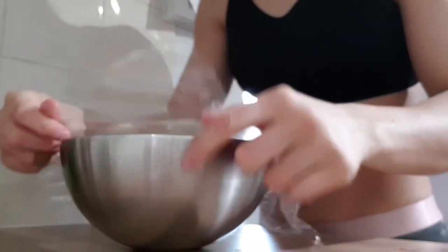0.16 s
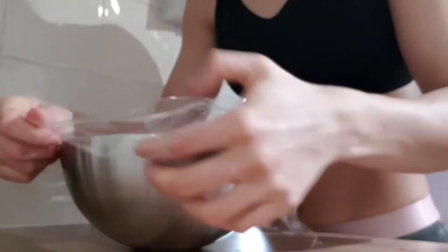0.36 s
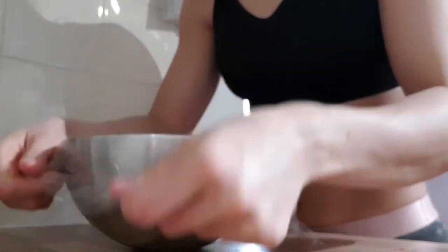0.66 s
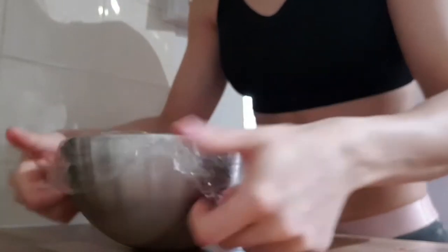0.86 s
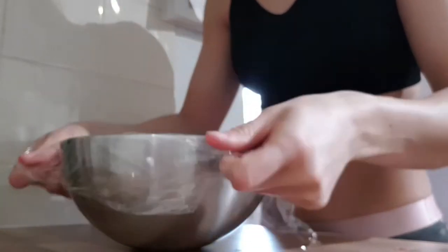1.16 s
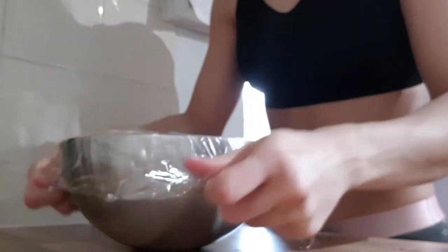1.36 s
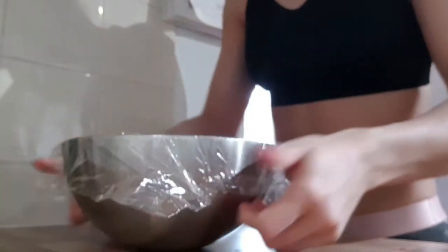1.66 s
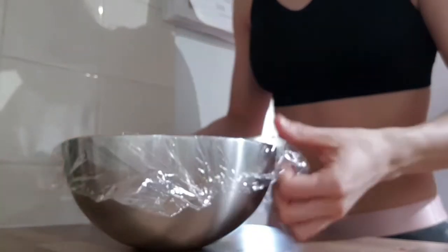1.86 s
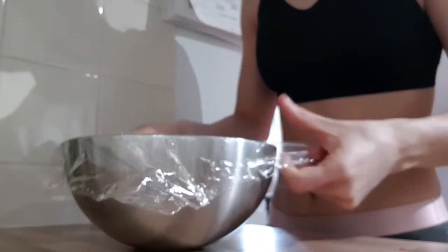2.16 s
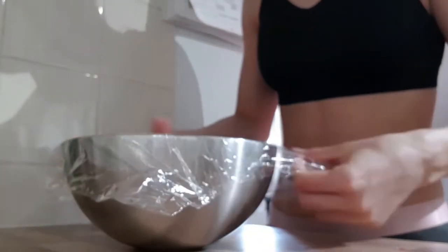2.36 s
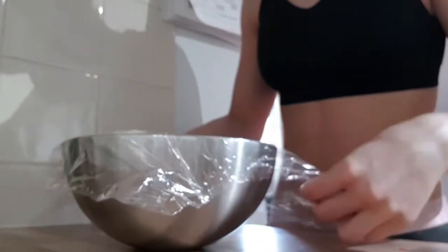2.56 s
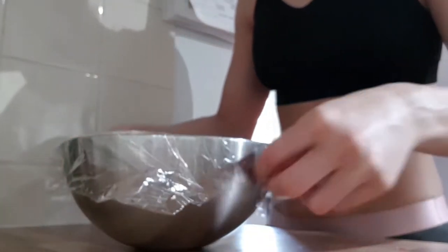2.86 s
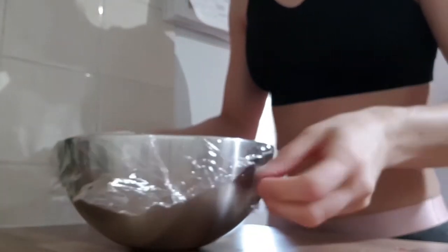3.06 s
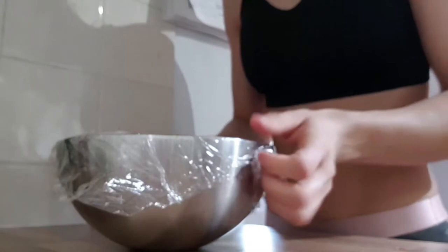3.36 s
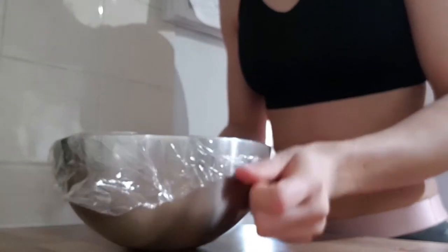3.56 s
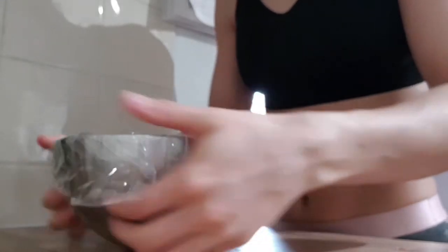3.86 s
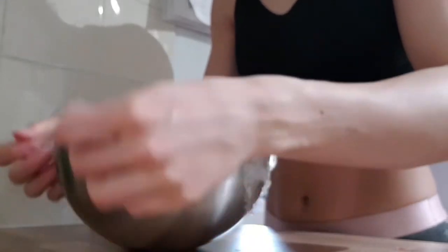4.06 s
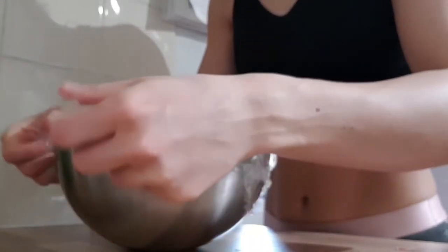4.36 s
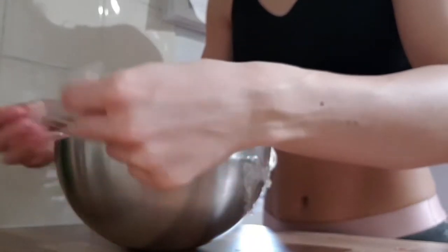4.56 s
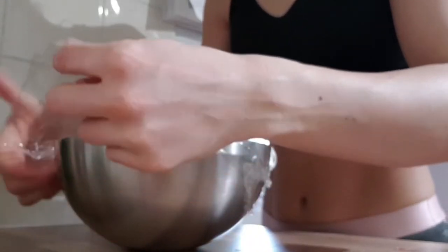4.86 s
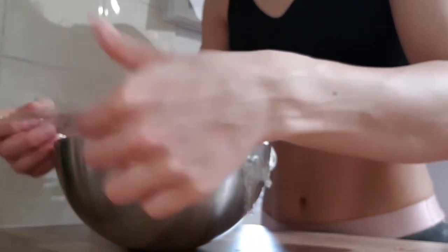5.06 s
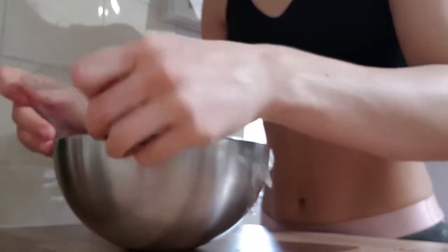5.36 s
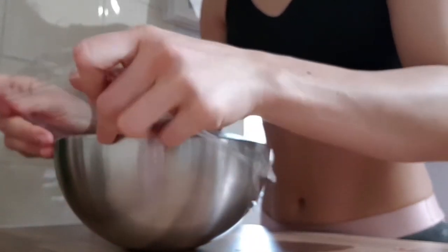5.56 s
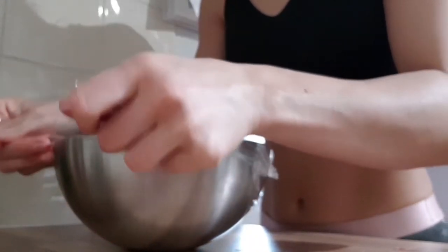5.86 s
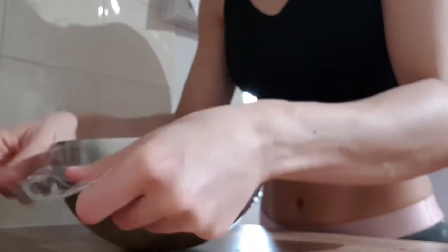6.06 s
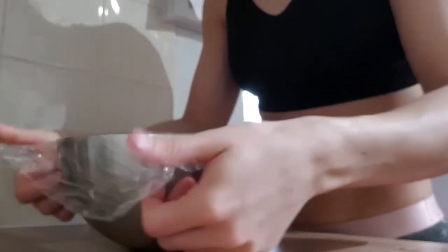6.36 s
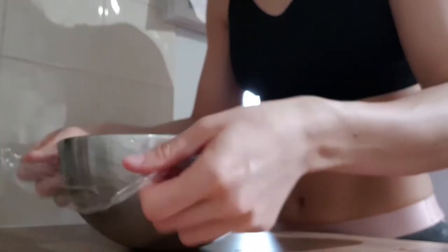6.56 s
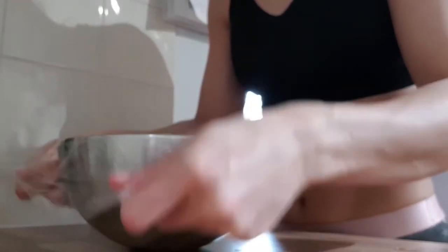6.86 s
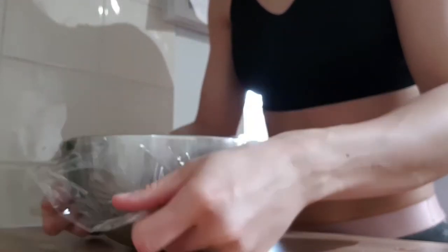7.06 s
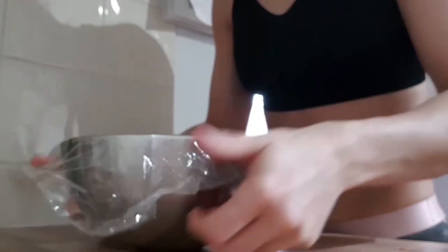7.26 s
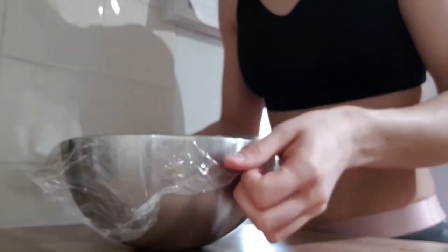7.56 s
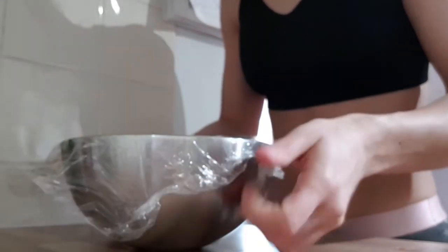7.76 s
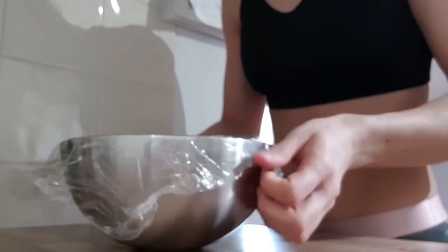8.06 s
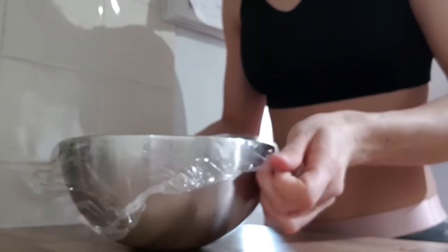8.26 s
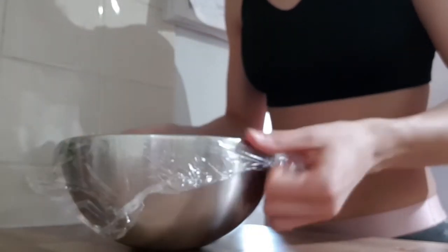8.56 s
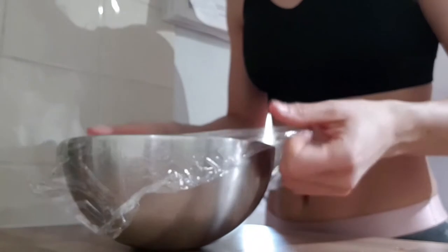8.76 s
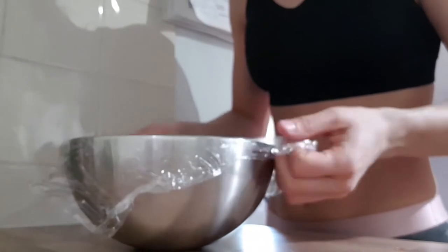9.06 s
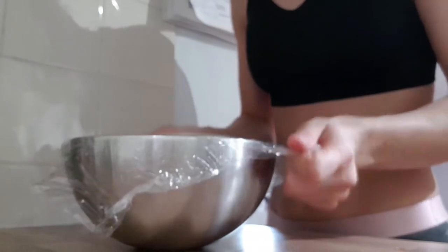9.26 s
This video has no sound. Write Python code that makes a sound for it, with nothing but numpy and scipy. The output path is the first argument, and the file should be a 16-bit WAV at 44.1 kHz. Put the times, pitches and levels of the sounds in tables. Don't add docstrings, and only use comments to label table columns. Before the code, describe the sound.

Close, bright rustling of cling film with sharp pops, while a metal bowl bumps and rocks on a countertop in a small kitchen.

```python
import sys
import numpy as np
from scipy import signal
from scipy.io import wavfile
from scipy.ndimage import uniform_filter1d

SR = 44100
rng = np.random.default_rng(int(sys.argv[2]) if len(sys.argv) > 2 else 0)


def log_audio(samples):
    frames = np.atleast_2d(samples).T
    limited = np.clip(frames, -1, 1)
    pcm = np.round(limited * 32767).astype(np.int16)
    wavfile.write(sys.argv[1], SR, pcm)


def level_to_linear(level):
    exponent = np.asarray(level, float) / 20
    return 10 ** exponent


N = 415422
T = np.arange(N) / SR

# start t/s, length t/s, change of crinkle level/dB
CATCHES = [
    (2.9, 0.057, -6.5),
    (9.2, 0.067, -6),
    (2.3, 0.046, 0.5),
    (2.1, 0.071, 0.5),
    (8.034, 0.017, 6),
    (4, 0.0055, 9),
    (2.4, 0.0074, 6),
]
# start t/s, length t/s, change of crinkle level/dB
SLIPS = [(0.181, 0.038, 3.5), (0.283, 0.049, 0.5), (0.39, 0.041, 2), (0.506, 0.155, 2.5),
         (0.793, 0.23, 2.7), (0.998, 0.11, 1), (1.778, 0.04, 5), (1.99, 0.059, 2), (2.124, 0.036, 1.5),
         (2.303, 0.09, 2), (2.457, 0.18, 1.3), (2.829, 0.052, 2), (2.9, 0.045, 4.5), (3.127, 0.02, 4),
         (3.197, 0.022, 2.5), (3.263, 0.088, 3.5), (3.429, 0.16, -6.5), (3.6, 0.16, 1.5),
         (3.937, 0.097, -4.5), (4.007, 0.12, -3.5), (4.183, 0.049, -1.5), (4.384, 0.16, 5.5),
         (4.6, 0.025, -4), (4.644, 0.34, 3.2), (4.985, 0.057, -2.5), (5.237, 0.054, 4.5), (5.327, 0.057, 4),
         (5.451, 0.03, 4), (5.69, 0.069, 2), (5.796, 0.043, 7.5), (5.883, 0.084, -4.5), (6.009, 0.032, -7),
         (6.284, 0.036, -3.5), (6.632, 0.085, -7), (6.073, .09, 2), (3.434, 0.05, -3), (1.917, .055, -3.5),
         (6.9, 0.05, 3), (7.438, 0.029, -10.5), (7.798, 0.025, -8), (7.85, 0.18, -1), (7.897, 0.026, -5.5),
         (8.042, 0.06, -6), (8.118, 0.035, 8), (8.454, 0.058, 3.5), (8.852, 0.043, 4), (8.91, 0.022, -3),
         (9.006, 0.12, 0), (9.13, 0.028, 6), (9.302, 0.034, -5.5)]


def evened(x):
    return x / np.sqrt(np.mean(x ** 2) + 1e-20)


def read(points, hz):
    f, value = np.transpose(points)
    return np.interp(np.log(hz + 1), np.log(f + 1), value)


def add(mix, s, sound):
    part = mix[..., round(s * SR):][..., :sound.shape[-1]]
    part += sound[..., :part.shape[-1]]


def colour(x, points):
    hz = abs(np.fft.fftfreq(4096, 1 / SR))
    log_gain = np.log(level_to_linear(np.maximum(read(points, hz), -100)))
    taps = np.fft.ifft(np.conj(np.exp(signal.hilbert(log_gain)))).real[:2048]
    return signal.oaconvolve(x, taps[(None,) * (x.ndim - 1)], axes=-1)[..., :x.shape[-1]]


def ring(modes, t, chance, detune):
    x = np.zeros(len(t))
    for (hz, db, t60), c in zip(modes, chance):
        x += level_to_linear(db - 60 * t / t60) * np.sin(2 * np.pi * hz * (1 + detune * c) * t)
    return x / abs(x).max()


def creases(per_s, spread_db, clump_db, clump_s):
    width = int(clump_s * SR)
    clumps = evened(uniform_filter1d(uniform_filter1d(rng.standard_normal(N), width), width))
    size = level_to_linear(spread_db * np.minimum(rng.exponential(1, N), 5) + clump_db * clumps)
    return size * (rng.random(N) < per_s / SR) * rng.choice([-1., 1.], N)


def effort(moves):
    t = T[::64, None]
    s, top_db, swell, fade = np.transpose(moves)
    db = top_db - 20 * np.maximum((s - t) / swell, (t - s) / fade)
    return level_to_linear(np.interp(T, t[:, 0], db.max(axis=1)))


def catches(moments, size):
    db = sum(change * ((T > s) & (T < s + length)) for s, length, change in moments)
    return level_to_linear(uniform_filter1d(db, size))


def surroundings(x, wet_db, moves_per_s=30):
    lags = [22, 2, 20, 23, 22]
    # f/Hz, t60/s
    tail_decay = [(400, 0.083), (1300, 0.079), (3500, 0.085), (9000, 0.054)]
    length = SR // 8
    out, slots = np.zeros((2, N)), np.arange(40, length - 20, 12)
    places = lags + lags
    for k, lag in enumerate(places):
        taps = np.zeros((2, length))
        at = slots + rng.integers(0, 12, (2, len(slots)))
        np.put_along_axis(taps, at, rng.choice([-1., 1.], at.shape), 1)
        hz, t, z = signal.stft(taps, SR, nperseg=128)
        decay = level_to_linear(-60 * t / read(tail_decay, hz)[:, None])
        tail = signal.istft(z * decay, SR, nperseg=128)[1]
        tail = tail * level_to_linear(wet_db) / np.linalg.norm(tail[0])
        tail[[0, 1], [max(lag, 0), max(-lag, 0)]] += 1
        place = (T * moves_per_s - k) % len(places)
        share = np.sin(np.pi / 2 * np.minimum(place, 2))
        out += signal.oaconvolve((x * share)[None], tail, axes=1)[:, :N]
    return out


def floor():
    # f/Hz, level/dB per Hz
    hiss = [(18, -35.5), (30, 14.5), (101, -10.5), (440, -27), (2130, -16.5), (3570, -15.5), (4280, -15),
            (5830, -16.5), (10600, -8), (14400, -34.5)]
    return level_to_linear(-57) * evened(colour(rng.standard_normal((2, N)), hiss))


def rumble():
    # f/Hz, bandwidth f/Hz, level/dB
    resonances = [(55, 78, -24.5), (79.5, 34.7, 1.5), (105.2, 27.5, -1), (139, 44, -9.5), (224, 156, -2.5),
                  (352.4, 78, -8.5)]
    # peak t/s, rumble level/dB, swell t/s and fade t/s per 20 dB
    rocks = [(.05, -40.5, 0.28, 0.03), (.5, -45, 0.49, 0.13), (.6, -45, 0.12, 0.11),
             (.81, -33, 0.056, 0.19), (.975, -34, 0.074, 0.37), (1.1, -29, 0.23, 0.11),
             (1.57, -38, 0.28, 0.27), (1.84, -35, 0.14, 0.16), (2.2, -49, 0.2, 2),
             (2.99, -45.5, 0.17, 0.64), (3.75, -35, 0.15, 0.066), (3.8, -25, 0.018, 0.23),
             (3.91, -49, .1, 0.9), (4.35, -42.5, 0.1, 0.18), (4.6, -49, 0.16, 2.4),
             (5.14, -37.5, 0.058, 0.4), (5.72, -32.5, 0.26, 0.15), (6.2, -47, 2.4, 3),
             (6.455, -12, 0.014, 0.044), (6.56, -33, 0.12, 0.071), (6.82, -40.5, 0.12, 0.75),
             (7.16, -34.5, 0.095, 0.49), (7.71, -49.5, 0.073, 0.17), (8.05, -48, 0.036, 0.7),
             (8.27, -43.5, 0.096, 1.1), (8.45, -41, 0.21, .21), (8.87, -37.5, 0.57, 0.1),
             (9.05, -34.5, 0.084, 0.13), (9.26, -43, 0.031, .38)]
    # start t/s, length t/s, change of rumble level/dB
    grips = [(0.329, 0.097, -10), (0.614, 0.11, 9), (1.192, 0.092, -6), (1.247, 0.56, 4),
             (2.085, 0.29, 5.5), (2.4, 0.06, -7), (2.519, 0.18, -10), (2.744, 0.17, 7), (3.043, 0.043, -9),
             (3.278, 0.081, 5), (3.617, 0.22, 0), (4.041, 0.04, -25.5), (4.18, 0.061, 7),
             (4.819, 0.18, -2.5), (5.552, 0.041, -12), (6.051, 0.11, -8.5), (6.271, 0.18, 4),
             (6.705, 0.031, -4.5), (6.854, 0.28, -1), (7.343, 0.05, -1.5), (7.583, 0.047, -14.5),
             (7.668, 0.09, 3.5), (7.827, 0.057, -7), (8.605, 0.067, -19)]
    pushes, out = creases(900., 2.2, 2.5, 0.019), np.zeros(N)
    for hz, width, db in resonances:
        r = np.exp(-np.pi * width / SR)
        pole = [1, 0, -1, 1, -2 * r * np.cos(2 * np.pi * hz / SR), r * r]
        out += level_to_linear(db) * evened(signal.sosfilt([pole, pole], pushes))
    return effort(rocks) * evened(out) * catches(grips, size=900)


def knocks():
    # f/Hz, level/dB, t60/s
    boom_modes = [(85, -16, .25), (103.7, 19.5, 0.19), (136.7, -1.5, 0.13)]
    # f/Hz, level/dB, t60/s
    pair_modes = [(362.4, 3, 0.2), (409, 8.5, 0.097), (454, -9.5, 0.28), (564, -4.5, 0.14)]
    # f/Hz, level/dB, t60/s
    steel_modes = [(683, -7.5, 0.16), (735, -17.5, 0.25), (852, 9, 0.035), (1080, -4, 0.0394),
                   (1472, -3, 0.044), (1790, 4, 0.0093), (2620, -3.5, 0.016)]
    # t/s, peak level/dB, plate f/Hz, then upper and steel level/dB above peak
    blows = [(0.986, -15.5, 136, -0.5, -28), (1.069, -21, 185, -12, -20), (1.135, -27, 171, -22, -28),
             (1.5602, -15, 224, -6.5, -15.5), (1.821, -27.5, 232, 8.5, -2), (3.787, 0, 240.6, -6.5, -10),
             (3.827, -16, 243, -7, -23), (5.699, -24, 232, 0, -13), (6.446, -4.5, 258, 0.5, -4),
             (6.463, -3, 213, -4, -12), (7.132, -18, 252, -6, -5), (7.169, -17, 267, -15, -19),
             (8.418, -29, 234, 3, -5), (4.348, -31.5, 142, 3.5, 10.5), (5.128, -30.5, 231, -2, -5),
             (6.229, -29, 216, -2, 0.5), (1.02, -25, 189, -2, -27), (1.044, -24, 181, -12, -27),
             (1.1, -28, 185, -13, -27), (1.165, -33, 175, -15, -25), (1.21, -35, 134, -15, -25),
             (5.15, -37.5, 238, 4, -15), (5.178, -37, 241, -6, -17), (5.706, -34, 204, 5, -20)]
    # t/s, peak level/dB, plate f/Hz, boom
    # level/dB above peak
    nudges = [(.582, -33.5, 91, -3), (.789, -30, 147, -27), (.967, -13.5, 192, -25), (3.104, -38, 260, 4),
              (3.697, -32, 146, 1), (5.648, -35, 202, -10), (6.518, -23.5, 196, -25),
              (6.791, -32.5, 263, -19), (7.244, -25, 271, -0.5), (7.701, -41.5, 262, -0.5),
              (8.037, -41, 227, 5.5), (8.114, -38, 230, 3), (8.2, -38.5, 224, 2), (8.833, -26, 242, -2),
              (9.246, -27, 253, -5), (9.348, -43, 141, 9.5), (.194, -59, 200, -4), (1.283, -43, 200, 4),
              (2.547, -51, 149, 11), (2.979, -51.5, 195, 15), (3.589, -43, 204, 0.5), (4.119, -50, 200, 11),
              (4.771, -27, 482, -32), (5.213, -47, 201, 11), (5.27, -46, 208, 6), (5.908, -40, 194, 1.5),
              (6.447, -33, 250, 12), (7.554, -53, 200, 10), (8.339, -40, 204, 1), (8.69, -30, 448, -15),
              (9.072, -28.5, 433, -15)]
    strikes = [(s, db, hz, -12, pair, steel) for s, db, hz, pair, steel in blows]
    strikes += [(s, db, hz, boom, -14, -12.5) for s, db, hz, boom in nudges]

    out, steel, t = np.zeros(N), np.zeros(N), np.arange(SR // 2) / SR
    chance = rng.standard_normal((len(strikes), 16))
    for (s, db, hz, boom_db, pair_db, steel_db), c in zip(strikes, chance):
        rise = 1 - np.exp(-t / (.0007 * level_to_linear(-.2 * db)))
        plate = ring([(hz, 0, 0.12 * (240 / hz) ** 0.55), (hz * 1.4, -8, .1)], t, c, 0.067)
        boom = level_to_linear(boom_db) * ring(boom_modes, t, c[2:], 0.04)
        boom *= 1 - np.exp(-t / 0.00067)
        pair = level_to_linear(pair_db) * ring(pair_modes, t, c[5:], 0.0417)
        add(out, s + 0.0021, -level_to_linear(db + 1.0) * rise * (plate + boom + pair))
        wall = ring(steel_modes, t, c[9:], 0.038)
        add(steel, s + 0.0018, level_to_linear(db + steel_db + 2.5) * rise * wall)
    return out + surroundings(steel, wet_db=3.0)


def snaps():
    # t/s, peak level/dB, ring f/Hz, treble level/dB above peak
    pops = [(.5, -24, 760, -6.5), (1.411, -26.5, 820, -8), (1.448, -25.5, 885, -16), (1.472, -21, 1390, 4),
            (1.819, -25.5, 680, -32), (2.335, -23.5, 638, -18), (4.346, -26.5, 780, -25),
            (4.774, -22, 680, -33), (6.617, -43.5, 900, -18), (5.637, -23.5, 620, -14),
            (5.649, -21, 684, -25), (5.6945, -18, 1850, -12), (5.796, -25, 590, -12),
            (5.912, -28.5, 1070, -3), (5.975, -29.5, 1570, -2), (6.272, -27, 1380, -5),
            (6.242, -23, 726, -17), (6.372, -19, 820, -28), (6.429, -22.5, 920, 0.5),
            (7.057, -17.5, 800, -7.5), (7.119, -9.5, 930, -0.5), (7.135, -4, 870, -22),
            (7.153, -9.5, 1060, -19), (7.297, -27, 907, -11.5), (7.336, -28.5, 1590, -11),
            (7.413, -32.5, 1495, -7), (8.134, -35, 1420, -5), (8.689, -31, 820, -17), (8.72, -11, 730, -10),
            (9.392, -21, 770, -18)]
    # t/s, peak level/dB, then ring and treble level/dB above peak
    cracks = [(0.024, -14, -29, -11.5), (0.803, -24, -30, -4.5), (0.964, -10.5, -21, -17),
              (0.984, -9.5, -30, -17), (1.089, -11.5, -15, -13.5), (1.331, -19, -4.5, -9.5),
              (1.461, -27, -29, 5), (1.479, -4, -7.5, -7), (2.195, -21.5, -7, -26), (2.662, -29, -6.5, -9),
              (4.306, -17.5, -14, -4.5), (4.634, -17, -17, -17), (5.091, -34.5, -9, 2),
              (5.175, -15, -19, -16), (5.751, -21, -9.5, -8.5), (5.853, -21, -26, -18),
              (6.844, -5, -6, -11.5), (6.949, -20.5, -19, -8.5), (6.97, -8.5, -13, -25.5),
              (7.0642, 4.5, -4, -19), (7.144, -9.5, -22.5, -36), (7.188, -6, -8, -15),
              (7.244, -5, -17, -11), (7.275, -18.5, -15, -11), (8.244, -16, -19.5, -21),
              (8.462, -11.5, -14, -13.5), (8.624, -12, -25, -13), (9.0265, -6, -13, -25),
              (9.0725, -1.5, -20, -17.5), (9.127, -15, -12, -20)]
    # t/s, level/dB (7 dB under the peak), then ring
    # and treble level/dB above peak
    more_cracks = [(0.4299, -35, -10.5, -15), (0.7138, -47, -24, -14), (0.8944, -25, -11, -27),
                   (1.1548, -36.5, -12, -5), (1.2196, -37, -18, -7), (1.6791, -34.5, -6, -15),
                   (2.2304, -29, -11, -21), (2.2944, -36, -5, -18), (2.996, -34, -14, -20),
                   (3.1215, -28, -21, -13), (3.1915, -22.5, -18, -28), (4.5775, -32, -13, -11),
                   (4.7046, -34, -16, -14), (4.8514, -28, -21, -12), (5.016, -42.5, -0.5, -31),
                   (5.0679, -47, -10, -10), (5.1223, -29, -20, -10), (5.2698, -34.5, -1.5, -17),
                   (5.5717, -39.5, -4, -24), (5.6811, -28, -5, -18), (5.893, -44, -16, -24),
                   (5.9876, -22.5, -26, -12), (6.0397, -27.5, -31, -13), (6.1908, -39, -5, -24),
                   (6.2233, -32, 0, -21), (6.4028, -28.5, -8, -16), (6.5216, -29, -14, -23),
                   (6.7216, -50, -23, -14), (6.7491, -29, -18, -10), (6.7999, -22, -13.5, -16),
                   (7.2165, -18.5, -12.5, -18.5), (7.3736, -27.5, -20, -17.5), (7.437, -30, -11, -10),
                   (7.4884, -38, -10.5, -5), (7.6261, -33.5, -27, -11), (7.8466, -27.5, -26.5, -18),
                   (8.0805, -42, -14, -12), (8.1943, -40, -16, -6), (8.7864, -33, -13, -26),
                   (9.0391, -24, -14, -15)]
    crack_hz, crack_t60 = 876, 0.014
    releases = [(s, db, hz, 0, top, 0.012) for s, db, hz, top in pops]
    releases += [(s, db, crack_hz, sheet, top, crack_t60) for s, db, sheet, top in cracks]
    releases += [(s, db + 7, crack_hz, sheet, top, crack_t60) for s, db, sheet, top in more_cracks]

    out, t = np.zeros(N), np.arange(3000) / SR
    noise = rng.standard_normal((len(releases), 4, len(t)))
    noise[:, 1:, 0] = 3.95
    low = signal.butter(2, [750., 2800.], "band", fs=SR)
    mid = signal.butter(2, [2200., 6000.], "band", fs=SR)
    top = signal.butter(2, [7500., 14000.], "band", fs=SR)
    for (s, db, hz, ring_db, top_db, t60), (a, b, c, d) in zip(releases, noise):
        modes = [(hz, 0, t60), (hz * 1.52, -4, 0.41 * t60), (hz * 3.3, -8, 0.21 * t60)]
        sheet = ring(modes, t, [0, *a[1:3]], 0.046)
        sheet += level_to_linear(-22.5 - 60 * t / 0.12) * np.sin(2 * np.pi * 490.0 * t)
        sheet += level_to_linear(1.0 - 60 * t / t60) * signal.lfilter(*low, d)
        crack = level_to_linear(-13.5 - 60 * t / t60) * signal.lfilter(*mid, b)
        tick = level_to_linear(top_db + 8.0 - 60 * t / (0.6 * t60)) * signal.lfilter(*top, c)
        onset = 1 - np.exp(-t / 0.00035)
        add(out, s + 0.001226, level_to_linear(db + 1.0) * (level_to_linear(ring_db) * sheet + (crack + tick) * onset))
    out = signal.sosfilt(signal.butter(7, 650., "high", fs=SR, output="sos"), out)
    return surroundings(out, wet_db=-1.5)


def rustle():
    # f/Hz, level/dB per Hz
    fine_spectrum = [(710, -25), (1150, -5.5), (1500, -2.5), (3600, 1), (5600, -7), (8740, 0), (11500, 2.5),
                     (14400, -5)]
    # f/Hz, level/dB per Hz
    coarse_spectrum = [(150, -16), (390, -12), (570, -12.5), (760, -6), (1800, -18), (4500, -25.5),
                       (6500, -28.5), (11000, -120)]
    # peak t/s, crinkle level/dB, swell t/s and fade t/s per 20 dB
    draping = [(.02, -39, 0.051, 0.1), (.26, -46.5, 0.21, 0.084), (.5, -52.5, 1.5, 0.35),
               (.89, -43, 0.34, 0.14), (1.0, -49.5, .2, 0.65), (1.36, -41.5, 0.19, 0.24),
               (1.52, -40, 0.14, 0.069), (1.68, -49.5, 0.72, 0.89), (1.84, -46, 0.33, 0.053),
               (2.2, -43.5, 0.24, 0.17), (2.33, -46, 0.34, 0.59), (2.485, -45, 0.81, 0.038),
               (2.57, -52, 0.4, 0.17), (2.68, -48.5, 0.07, 0.57), (3.03, -47.5, 0.36, 0.16),
               (3.17, -47.5, 0.55, 0.28), (3.43, -55.5, 1.3, 0.02), (3.67, -40.5, 0.15, 0.67),
               (3.78, -37.5, 0.39, 0.15), (3.93, -45, 0.46, 0.074)]
    # peak t/s, crinkle level/dB, swell t/s and fade t/s per 20 dB
    stretching = [(4.3, -37.5, 0.38, 0.14), (4.642, -44.5, 0.14, 0.12), (4.72, -48, .1, 0.42),
                  (4.832, -50.5, 0.41, 0.6), (5.11, -47, 0.065, 0.33), (5.35, -49.5, 0.54, 0.069),
                  (5.51, -50.5, 0.21, 0.13), (5.69, -42, 0.22, 0.11), (6.007, -45, 0.16, 0.056),
                  (6.241, -41.5, 0.072, 0.11), (6.44, -40.5, 0.17, 0.17), (6.526, -39.5, 0.1, 0.041),
                  (6.768, -44, 0.082, 0.22), (6.85, -39, 0.04, 0.14), (6.98, -41.5, 0.31, 0.094),
                  (7.075, -32.5, 0.035, 0.08), (7.138, -21.5, 0.023, 0.077), (7.24, -47, 0.41, 0.34),
                  (7.448, -38, 0.091, 0.033), (7.74, -50, 0.42, 0.2), (7.9, -48, 0.31, 0.082),
                  (8.088, -57.5, 0.088, 1.5), (8.3, -47, 0.24, 0.49), (8.4, -42, 0.12, 0.42),
                  (8.63, -39.5, 0.14, 0.21), (8.76, -45.5, 1, 1.3), (8.97, -44, 0.65, 0.13),
                  (9.161, -49.5, 0.55, 0.68), (9.42, -44, 0.4, .1)]
    # t/s, coarse crease level/dB above the fine crinkle
    slack = [(0.0, -7.5), (.9, -3), (1.1, -8), (1.5, 4), (1.7, -8), (2.25, -4), (2.6, -5), (3.1, -7),
             (3.57, -13.5), (3.69, -2.5), (4.3, -10), (4.75, -4), (5.2, -10), (5.7, 0.5), (6.45, -1.5),
             (6.75, -7), (7.1, -4.5), (7.85, -14.5), (8.6, -8.5), (9.1, -6)]
    s, coarse_db = np.transpose(slack)
    fine = evened(colour(creases(1700., 3.04, 1.0, 0.01), fine_spectrum))
    coarse = evened(colour(creases(2000., 5.4, 0.43, 0.026), coarse_spectrum))
    fine += level_to_linear(-10.0) * evened(colour(creases(150., 2.0, 4.9, 0.0051), fine_spectrum))
    film = effort(draping + stretching) * (fine + level_to_linear(np.interp(T, s, coarse_db)) * coarse)
    film = film * catches(CATCHES + SLIPS, size=330)
    return level_to_linear(-1.5) * surroundings(film, wet_db=4.0, moves_per_s=70)


def scene():
    high_pass = signal.butter(3, 60., "high", fs=SR, output="sos")
    counter = signal.sosfilt(high_pass, knocks() + rumble())
    hiss = floor() * catches(CATCHES + SLIPS, size=600)
    return hiss + counter + snaps() + rustle()


def roll_off(x):
    return signal.sosfilt(signal.butter(12, 15840, fs=SR, output="sos"), x)


def record(dry):
    # f/Hz, left minus right level/dB
    lean = [(60, 0.5), (130, 0.5), (290, -2), (640, -6.5), (1410, 0), (3100, -3), (6820, 3), (15000, -4)]
    half = [[(hz, side * db / 2) for hz, db in lean] for side in (1, -1)]
    heard = np.array([colour(x, h) for x, h in zip(dry, half)])
    low_pass = signal.firwin(1023, 14620, window=("kaiser", 6), fs=SR)
    heard = signal.oaconvolve(heard, low_pass[None], "same")
    heard = np.tanh(heard * 0.79) / 1.346 * .5 + heard * .5
    return roll_off(heard)


dry = scene()
out = record(dry)
log_audio(out)
```